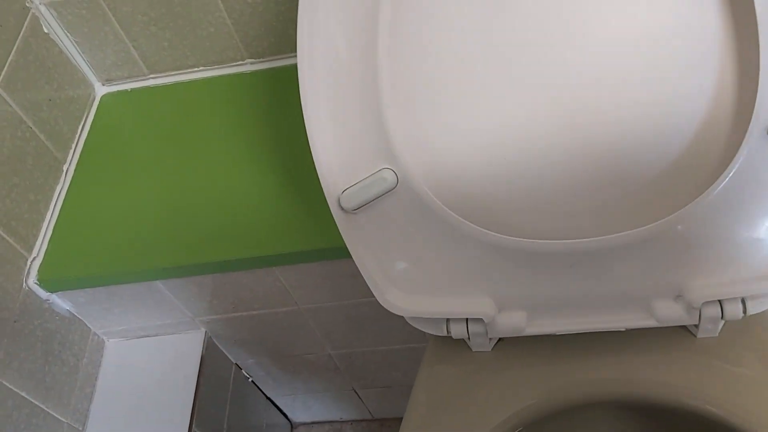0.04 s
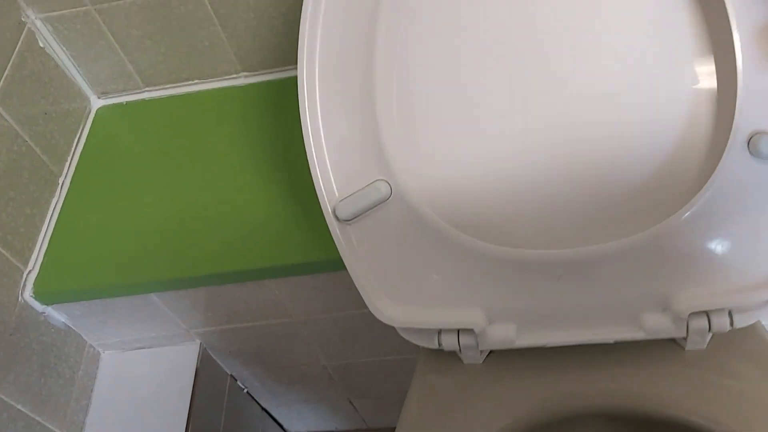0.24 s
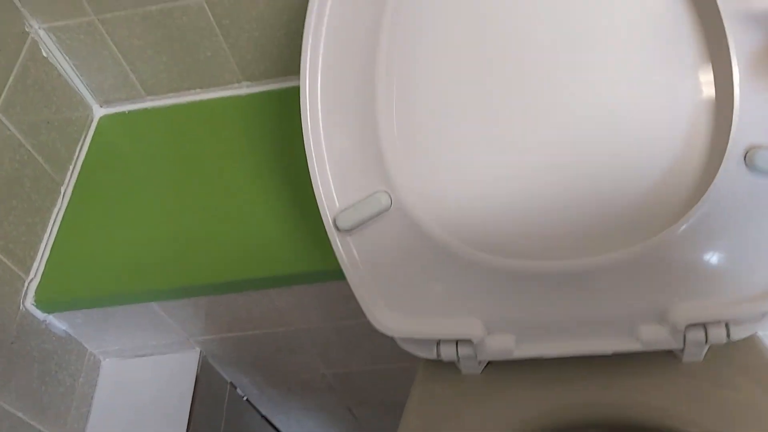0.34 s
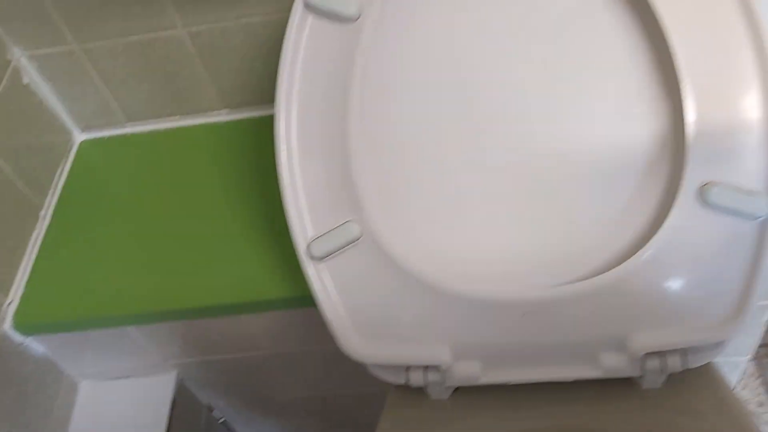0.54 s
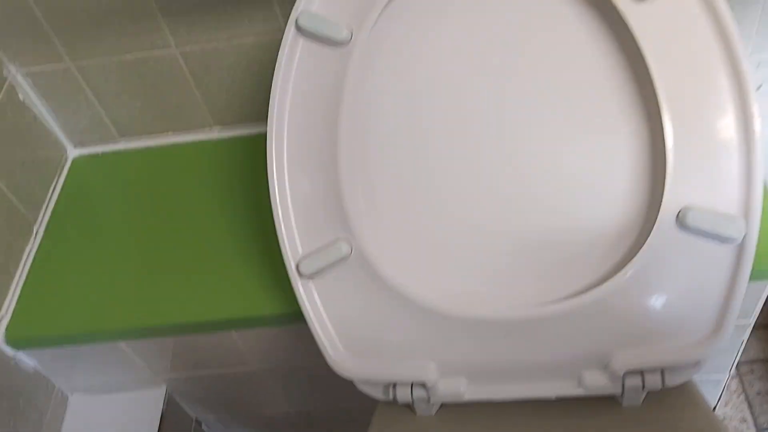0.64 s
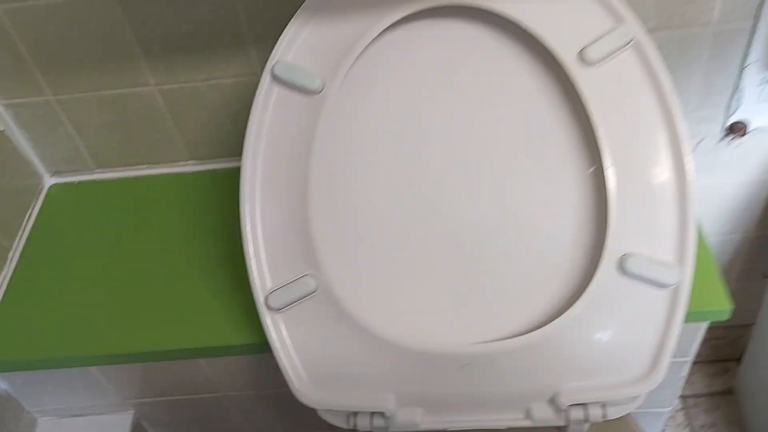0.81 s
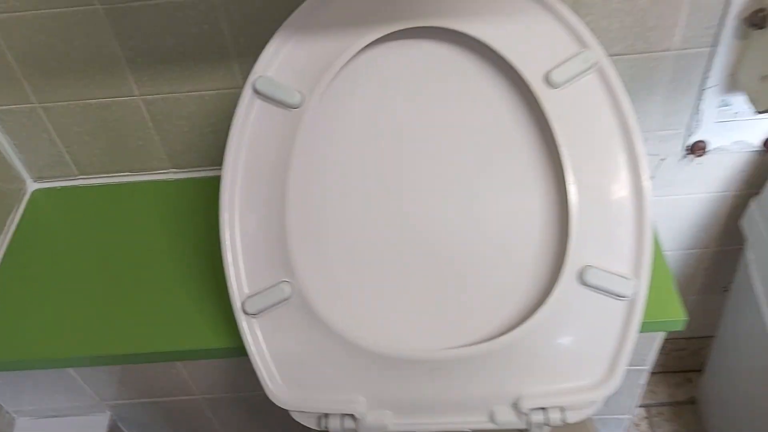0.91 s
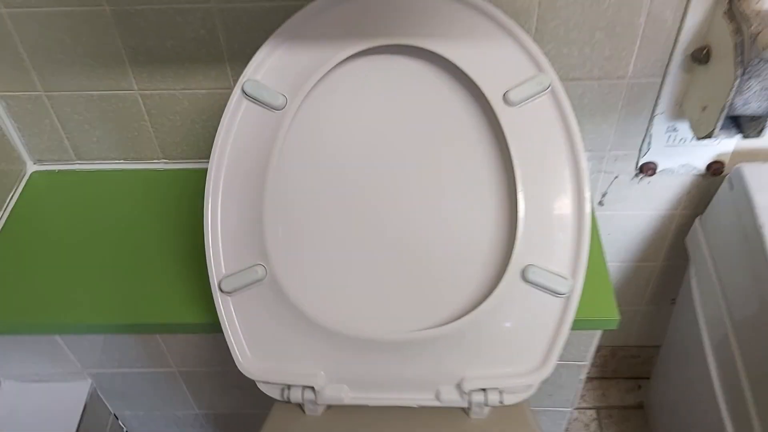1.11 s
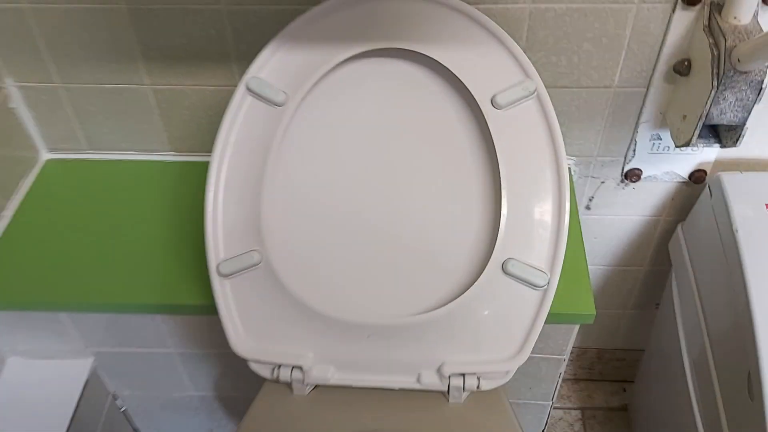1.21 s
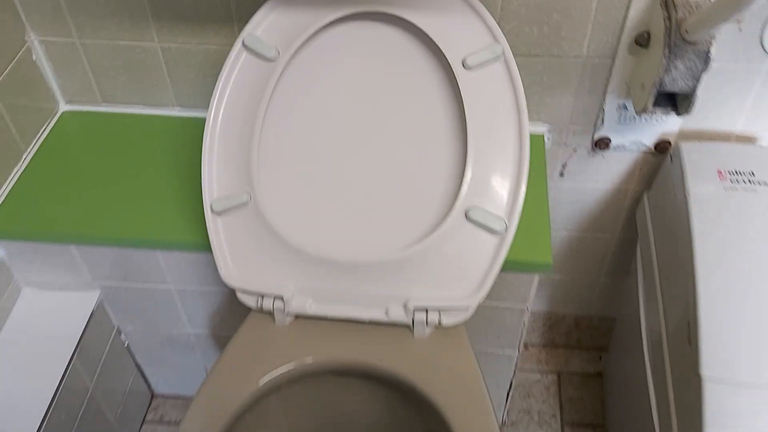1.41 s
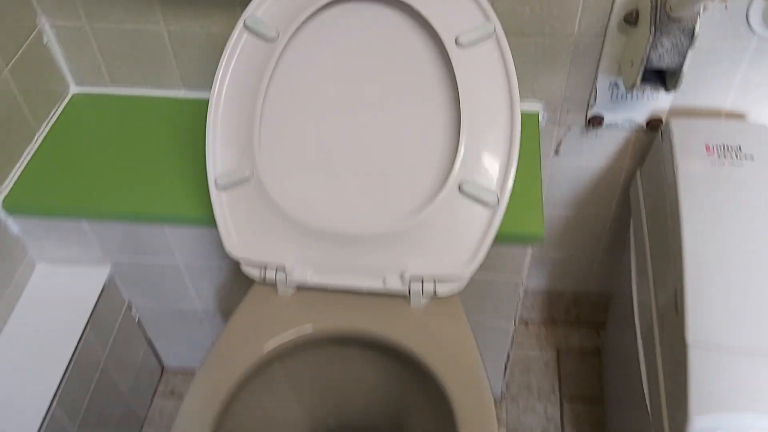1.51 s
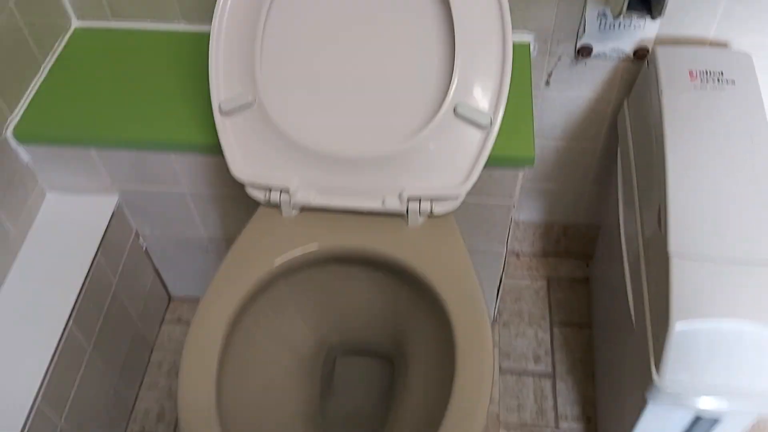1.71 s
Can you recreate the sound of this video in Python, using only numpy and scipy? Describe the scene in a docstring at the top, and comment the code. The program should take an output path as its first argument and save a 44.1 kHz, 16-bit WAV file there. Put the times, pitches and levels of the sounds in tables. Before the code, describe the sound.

A plastic toilet seat and lid bang against the wall, rattling in an echoing tiled washroom.

```python
"""A small tiled washroom, heard from the two microphones of a hand-held camera.
Across the room a plastic toilet seat and lid are flung back against the wall. They strike one after
the other, rattle and rebound; the plastic cracks and rings, the room booms and rings on.
Close to the microphones, clothing rustles and fingers knock softly on the camera.
A background hiss lies under it all."""
import sys
import numpy as np
from scipy import signal
from scipy.fft import rfft, irfft
from scipy.io import wavfile

SR = 44100
rng = np.random.default_rng(int(sys.argv[2]) if len(sys.argv) > 2 else 0)


def persist_wave(psi):
    """Save psi, clipped to +-1, as 16-bit WAV."""
    counts = np.round(np.clip(psi, -1, 1) * 32767).astype(np.int16)
    wavfile.write(sys.argv[1], SR, np.atleast_2d(counts).T)


N = 77175


def seat_and_lid():
    """Each blow on the wall cracks, rings the plastic shell, fills the room and pumps the low modes."""
    # blows (time [s], crack [dB], treble corner [Hz], shell ring [dB], room [dB], low modes [dB])
    blows = [(0.2365, 0, 20000, -13, -2, 0.5), (0.2438, -2, 11100, 0, -1.5, -2.5),
             (0.3006, -12, 9000, -12, -11.5, -4.5), (0.3446, -6, 4550, -12.5, -10.5, 1),
             (0.3981, -10.5, 5440, -20, -15.5, -5), (0.4183, -2, 1660, -24, -14, -2.5),
             (0.4244, -7, 3500, -20, -12, -0.1), (0.4723, -27, 3000, -28, -20, -13)]
    # low modes of seat, lid and room (frequency [Hz], level [dB], t60 [s], build-up [s])
    low_modes = [(66.8, -35, 1.0, 0.022), (100.4, -22.5, 0.48, 0.063), (157.1, -26, 0.604, 0.078),
                 (180, -20, .11, 0.0039), (245.3, -15.5, 0.082, 0.0028), (265.4, -29, 0.88, 0.014),
                 (284.5, -11.5, 0.43, 0.029), (288.8, -22.5, 0.83, 0.082), (344, -9.5, 0.13, 0.017),
                 (367.3, -27.5, 0.73, 0.011), (414.6, -26, 0.69, 0.0014), (438.6, -26, 0.54, 0.00098),
                 (506.8, -30.5, 0.72, 0.0014), (574, -40.5, 0.89, 0.037)]
    # bright modes of the plastic shell (frequency [Hz], level [dB], t60 [s])
    shell_modes = [(784, -29, 0.88), (914, -45, 0.076), (1244, -26, .09), (1475, -13.5, 0.076),
                   (1962, -33, 0.3), (2252, -25.5, 0.27), (2635, -25, 0.099), (5200, -43, 0.025),
                   (6220, -40, 0.072), (6790, -26, 0.03)]
    # spectrum of the crack (frequency [Hz], relative level [dB])
    crack_spectrum = [(60, -35), (200, -12), (400, 12.5), (700, -5), (1000, 2.5), (1450, 9), (1850, -4),
                      (2500, 3), (3300, -3), (4500, -7), (6700, 3.5), (8000, -12), (15500, -11.5)]
    crack_gain_db, crack_rise_s, crack_t60_s = 12.5, 0.0006, 0.013
    t = np.arange(N) / SR
    boom, shell, out = np.zeros(N), np.zeros((2, N)), np.zeros((2, N))
    for hz, db, t60, rise in low_modes:
        boom += amp(db - 60 * t / t60) * (1 - np.exp(-t / rise)) * np.sin(2 * np.pi * hz * t)
    for hz, db, t60 in shell_modes:
        mic_phase = rng.uniform(0, np.pi, (2, 1))
        shell += amp(db - 60 * t / t60) * np.sin(2 * np.pi * hz * t + mic_phase)
    snap = (1 - np.exp(-t / crack_rise_s)) * amp(-60 * (t / crack_t60_s) ** 2)
    for start, crack_db, corner_hz, shell_db, room_db, boom_db in blows:
        burst = unit_energy(diffuse_noise() * snap)
        crack = amp(crack_gain_db + crack_db) * shaped(burst, crack_spectrum)
        bright = crack + amp(shell_db) * shell + amp(room_db) * room_tail()
        contact_db = -10 * np.log10(1 + (bins() / corner_hz) ** 3)  # softer contacts are duller
        add(out, start, colour(bright, contact_db) + amp(boom_db) * boom)
    return out


def room_tail():
    """Dense reflections off the tiles reach the microphones; the low mids ring longest."""
    # spectrum of the reverberation (frequency [Hz], relative level [dB])
    room_spectrum = [(30, -41), (70, 3.5), (170, 0), (215, -8.5), (300, 10), (480, 3.5), (680, -3),
                     (1000, -2.5), (1400, 1.5), (1850, -0.5), (2500, 0.5), (3400, -10), (4500, -8),
                     (6700, -3.5), (8200, -14.5), (15500, -8)]
    # decay of the tiled room (frequency [Hz], t60 [s])
    room_t60 = [(80, 0.39), (300, 1), (700, 1), (2000, 0.77), (6000, 0.65), (9000, 0.54), (15000, 0.21)]
    gain_db, rise_s = 14.5, 0.0086
    hz, t, spectra = signal.stft(diffuse_noise(), SR, nperseg=256)
    decay = amp(-60 * t / curve_at(room_t60, hz)[:, None])
    tail = signal.istft(spectra * decay, SR, nperseg=256)[1][:, :N]
    build_up = 1 - np.exp(-np.arange(N) / SR / rise_s)
    return amp(gain_db) * shaped(unit_energy(tail * build_up), room_spectrum)


def finger_knocks():
    """Fingers bump the camera right by the microphones: a short tap, then a dull, damped ring."""
    # knocks (time [s], level [dB], pitch [Hz], t60 [s])
    knocks = [(0.095, -38.5, 440, 0.042), (0.218, -35, 174.6, 0.29), (1.08, -46.5, 356, 0.13),
              (1.564, -30, 296, 0.011), (1.572, -38.5, 293, 0.027), (1.6625, -33.5, 403, 0.0031)]
    tap_db, tap_s = -6.5, 0.00025
    t, out = np.arange(N) / SR, np.zeros((2, N))
    contact = t / tap_s
    tap = amp(tap_db) * contact * (2 - contact) * np.exp(1 - contact)
    for start, db, hz, t60 in knocks:
        ring = amp(-60 * t / t60) * (1 - np.exp(-contact)) * np.cos(2 * np.pi * hz * t)
        add(out, start, -amp(db) * (tap + ring))
    return out


def clothing():
    """Cloth rubs near the microphones: grainy friction that swells and fades with each movement."""
    # strokes (peak time [s], rise [s], fall [s], level [dB], left minus right [dB], tilt [dB/octave])
    strokes = [(.1, 0.035, 0.31, -56, -2, 0.5), (.8, 0.32, 0.22, -61, 0, 0.5),
               (1.0, 0.024, 0.073, -50.5, 2.5, -1.2), (1.185, 0.04, 0.059, -52, 0, -0.3),
               (1.36, 0.045, 0.39, -57, -10, 0), (1.493, 0.0094, .04, -46, -0.5, 1),
               (1.56, 0.095, 0.07, -54.5, -15.5, -1.5), (1.674, 0.03, 0.031, -56.5, -21.5, -2.5)]
    # spectrum of the rustle (frequency [Hz], relative level [dB])
    cloth_spectrum = [(100, -10.5), (500, 8.5), (2500, -1.5), (3600, -4.5), (5500, -2.5), (7000, -7),
                      (8300, -8), (12500, 1.5), (15500, -7)]
    grain_db, pivot_hz = 2, 2040
    t, out = np.arange(N) / SR, np.zeros((2, N))
    octaves = np.log2(np.maximum(bins(), pivot_hz / 2) / pivot_hz)  # the tilt levels off in the bass
    for peak, rise, fall, db, pan_db, tilt in strokes:
        swell = np.exp(-np.where(t < peak, ((t - peak) / rise) ** 2, (t - peak) / fall))
        mic_gains = amp([[db + pan_db / 2], [db - pan_db / 2]])
        out += colour(diffuse_noise() * swell * mic_gains, tilt * octaves)
    grain = np.repeat(rng.standard_normal(N // 64 + 1), 64)[:N]  # a new level every 1.5 ms
    return shaped(out * amp(grain_db * grain), cloth_spectrum)


def background_hiss():
    """A background hiss that swells briefly with two clothing rustles, then sinks a little."""
    # spectrum of the hiss (frequency [Hz], relative level [dB])
    hiss_spectrum = [(25, -58), (65, -3.5), (200, -6), (400, 1.5), (800, -3), (1700, -2.5), (2500, 3.5),
                     (3400, -9.5), (6200, -6), (8200, -24), (15500, -26)]
    # level of the hiss (time [s], level [dB])
    hiss_level = [(0, -48.5), (.22, -48), (.8, -51), (.94, -49), (1.0, -46.5), (1.11, -50.5), (1.2, -49),
                  (1.32, -55), (1.45, -53.5), (1.52, -52), (1.75, -52)]
    level_db = np.interp(np.arange(N) / SR, *np.transpose(hiss_level))
    return shaped(diffuse_noise(), hiss_spectrum) * amp(level_db)


def diffuse_noise():
    """White noise arriving from all sides at two microphones, alike in the bass only."""
    # likeness of left and right (frequency [Hz], correlation [0..1])
    correlation = [(60, 0.64), (350, 0.77), (700, 0.31), (1300, 0.0017), (3000, 0.055), (15000, 0.045)]
    likeness = np.clip(curve_at(correlation, np.fft.rfftfreq(N, 1 / SR)), -1, 1)
    mid, side = rfft(rng.standard_normal((2, N)))
    mid *= np.sqrt((1 + likeness) / 2)
    side *= np.sqrt((1 - likeness) / 2)
    return irfft(np.array([mid + side, mid - side]), N)


def amp(db):
    """Decibels to gain."""
    return 10 ** (np.asarray(db) / 20)


def curve_at(points, hz):
    """A table's value, interpolated on a log-frequency axis."""
    table_hz, values = np.transpose(points)
    return np.interp(np.log(hz + 1), np.log(table_hz + 1), values)


def add(mix, start_s, sound):
    """Lays a sound into the mix at a time."""
    at = round(start_s * SR)
    mix[:, at:] += sound[..., :N - at]


def bins():
    """Frequencies of the double-length transform, in Hz."""
    return np.fft.rfftfreq(2 * N, 1 / SR)


def colour(x, gain_db):
    """Minimum-phase filter with the given gain at each frequency of bins()."""
    cepstrum = irfft(np.log(amp(gain_db)))
    cepstrum[1:N] *= 2
    cepstrum[N + 1:] = 0
    return irfft(rfft(x, 2 * N) * np.exp(rfft(cepstrum)))[..., :N]


def shaped(x, spectrum):
    """Colours a sound by a spectrum, keeping the power of white noise."""
    db = curve_at(spectrum, bins())
    return colour(x, db - 10 * np.log10(np.mean(amp(db) ** 2)))


def unit_energy(x):
    """Scales a stereo response to a mean energy of one per channel."""
    return x / np.sqrt(np.sum(x ** 2) / 2)


def scene():
    """Seat and hiss reach each microphone from farther off with its own colour; handling is close by."""
    # balance of the two microphones (frequency [Hz], left minus right [dB])
    mic_balance = [(100, 1.5), (300, -1), (700, -2), (1300, 0.5), (2400, 9.5), (4400, -0.5), (6500, 7.5),
                   (8300, -5.5), (11000, -2), (15000, 0.5)]
    left, right = seat_and_lid() + background_hiss()
    lean_db = curve_at(mic_balance, bins()) / 2
    far = np.array([colour(left, lean_db), colour(right, -lean_db)])
    return far + clothing() + finger_knocks()


def record(dry):
    """The microphone chain: low cut, soft overload on the loudest peaks, then the band limit."""
    low_cut_hz, ceiling, band_edge_hz = 32, 1.05, 15900
    trimmed = signal.sosfilt(signal.butter(3, low_cut_hz, "high", fs=SR, output="sos"), dry)
    limited = trimmed / (1 + (trimmed / ceiling) ** 4) ** (1 / 4)
    lowpass = signal.firwin(511, band_edge_hz, window=("kaiser", 9), fs=SR)
    return signal.oaconvolve(limited, lowpass[None], "same")


dry = scene()
out = record(dry)
persist_wave(out)
```